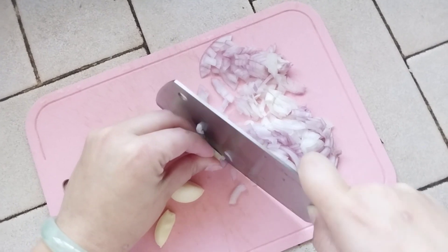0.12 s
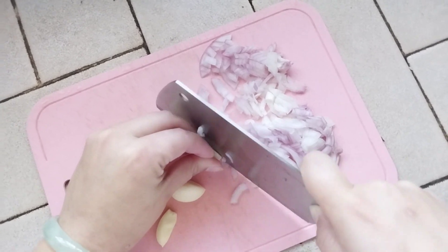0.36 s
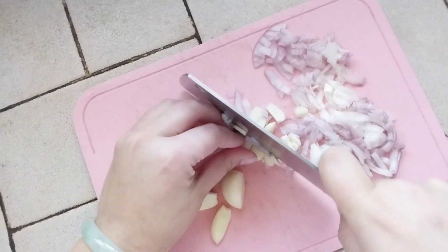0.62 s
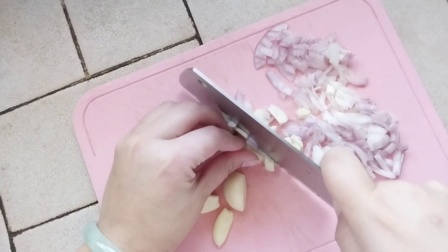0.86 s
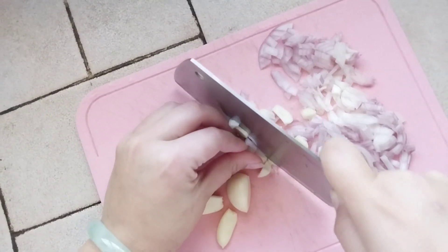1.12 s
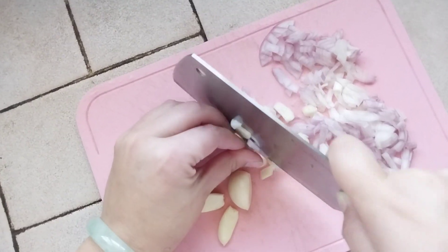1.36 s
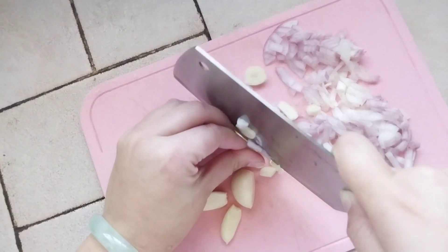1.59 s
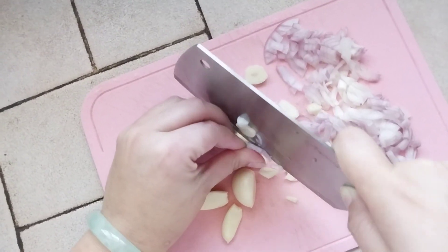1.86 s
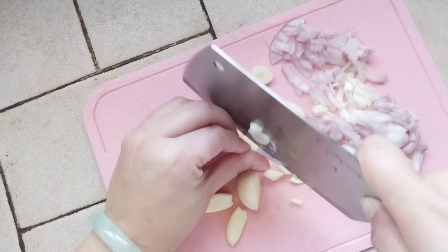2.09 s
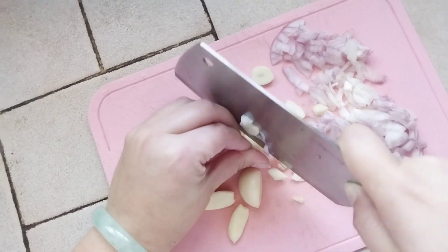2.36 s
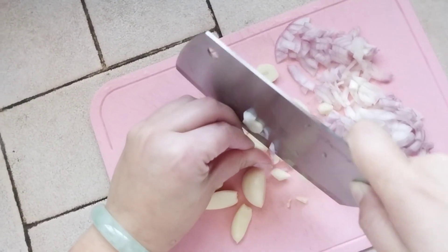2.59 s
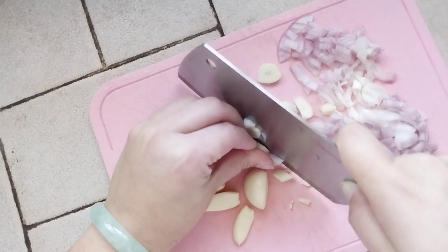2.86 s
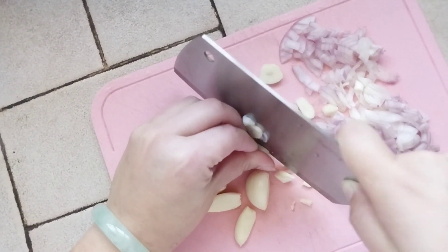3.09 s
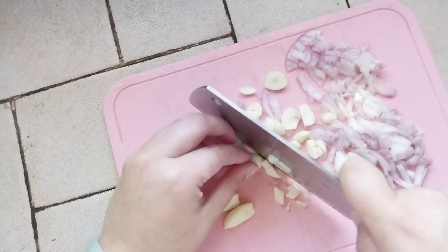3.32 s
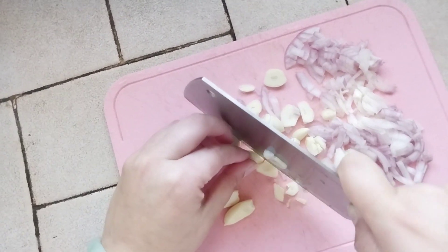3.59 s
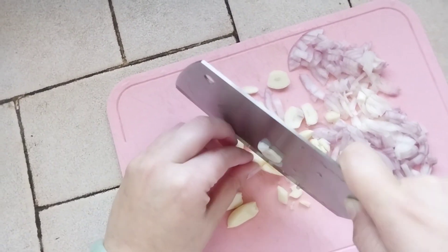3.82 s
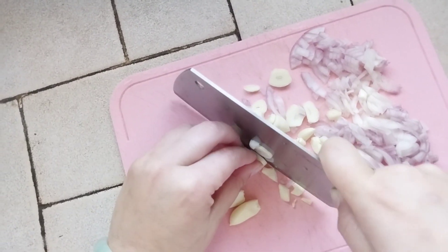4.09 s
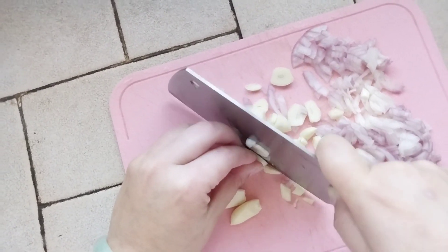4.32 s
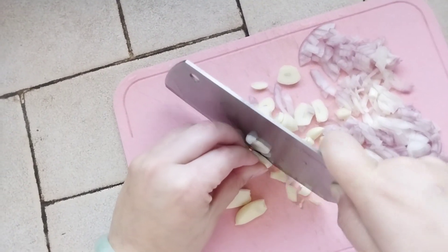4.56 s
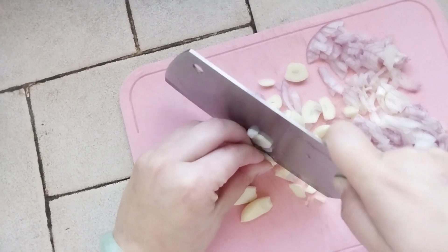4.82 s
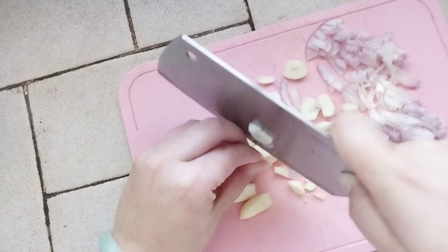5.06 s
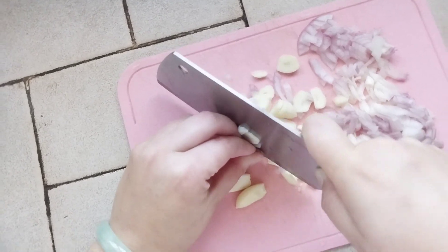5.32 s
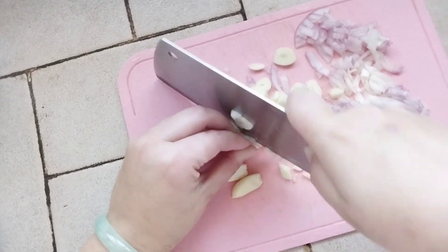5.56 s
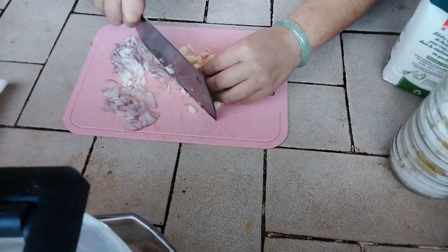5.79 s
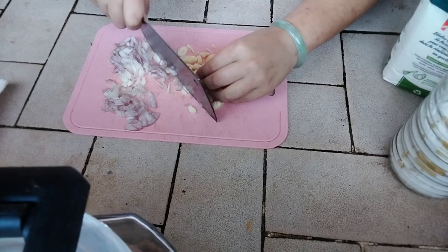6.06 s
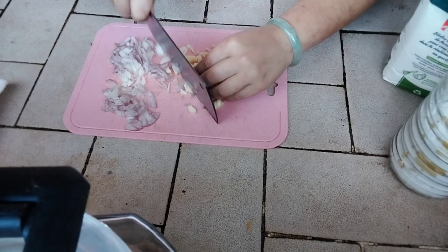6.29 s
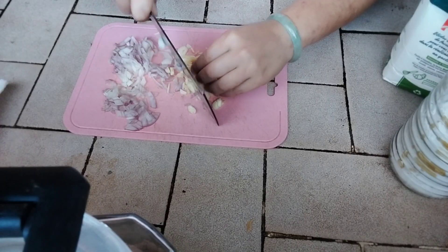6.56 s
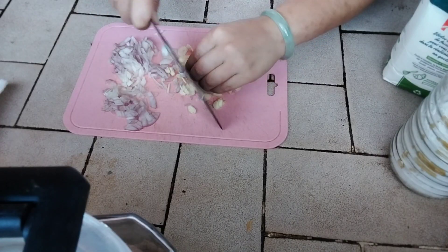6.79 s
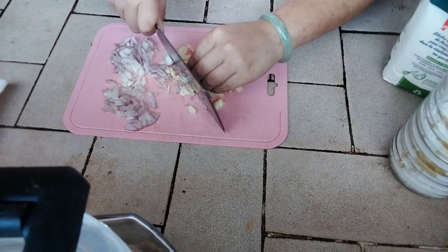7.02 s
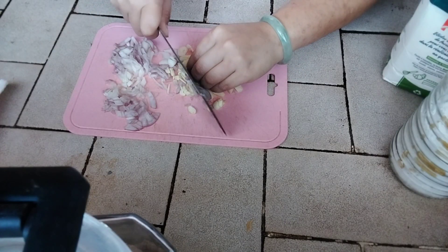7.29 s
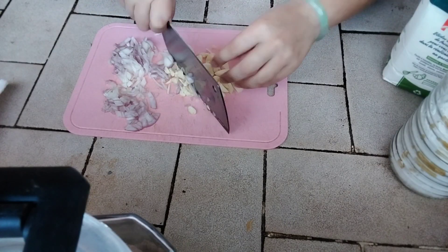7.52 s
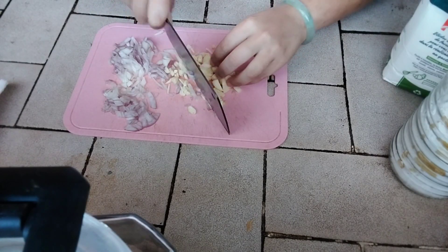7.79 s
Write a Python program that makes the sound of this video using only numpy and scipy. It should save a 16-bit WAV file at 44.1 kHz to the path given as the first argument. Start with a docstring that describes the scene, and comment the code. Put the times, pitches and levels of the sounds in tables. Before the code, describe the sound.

Outdoors on tiles near walls, a cleaver slices garlic on a thin plastic board, heard close in stereo. The fading tail of an earlier stroke opens the scene. From 0.1 s short crisp crackles end in hard, dry knocks, with an especially sharp one near 0.4 s. Strokes continue roughly four per second, uneven in force, with strong clacks around 1.5, 2.5, 2.9 and 3.2 s; some add dull thuds or a low boom, and brief diffuse echoes follow. A low breeze rumbles softly, dips about 3 s, then swells from 3.3 to 5 s, strongest near 4.7 s, while cutting goes on. A heavy crunchy double knock lands at 5.4 s. At about 5.7 s the sound abruptly becomes more distant and sheltered: wind nearly vanishes, and softer crunching strokes come about every third of a second until nearly 7.7 s, leaving faint outdoor hiss.

```python
"""Tiles near walls, in a breeze: a cleaver slices garlic on a thin plastic board beside a phone with two ports.
Each stroke crackles (dense random clicks, partly ringing the board) and ends in knocks (dying board modes).
Slower modes give thud and boom; noise tails are the walls' answer. Narrow noise bands make the breeze rumble.
From 5.72 s the breeze is all but gone, the crackle takes another colour and the strokes sound quieter."""
import sys
import numpy as np
from scipy import signal
from scipy.fft import rfft, irfft
from scipy.io import wavfile
from scipy.ndimage import uniform_filter1d

SR = 44100
rng = np.random.default_rng(int(sys.argv[2]) if len(sys.argv) > 2 else 0)


def ratio(d):
    """dB to gain"""
    e = np.asarray(d, float) / 20
    return 10 ** e


def int16_out(signal):
    """Quantize to a 16-bit WAV file."""
    q = np.round(np.clip(np.atleast_2d(signal).T, -1, 1) * 32767)
    wavfile.write(sys.argv[1], SR, q.astype(np.int16))


N = 348390
T = np.arange(N) / SR
HALF_S = T[:SR // 2]
SIDES = np.array([[1], [-1]])
CHANGE_S = 5.722  # from here the breeze drops and the crackle changes colour
PORT_LAG_SAMPLES = 5  # right port hears the board later
LOW_MODES = 3  # count of low board modes

# breeze level: time_s, level_db
WIND_LEVELS = [(0, -41.5), (0.56, -44.5), (0.95, -49), (1.5, -46.5), (2.8, -45.5), (3.05, -57), (3.32, -41),
               (3.34, -33.5), (3.8, -32), (4.1, -33.5), (4.65, -27), (4.95, -31.5), (5.22, -39),
               (5.6, -40.5), (5.71, -40), (5.73, -57), (6.6, -58.5), (7.9, -60.5)]
# breeze tone: freq_hz, gain_db
WIND_TONE = [(15, -48.5), (25, -9.5), (49, -27), (81, -5), (113, -8.5), (151, -3), (225, -8), (281, -13.5),
             (443, -38.5), (560, -35), (730, -67), (1230, -120)]
# outdoor hiss spectrum: freq_hz, density_rel_db
AIR_TONE = [(180, -39.5), (300, -3), (537, -5.5), (656, -2), (900, -11.5), (1430, -12.5), (1580, -17),
            (6200, -18), (9090, -21.5), (12500, -21), (16000, -38.5)]
# fading tail of an earlier stroke at the start, then faint scrapes and hums:
# peak_s, half_length_s (to 1/e), centre_hz, width_hz, level_db
FAINT_SOUNDS = [(0, 0.54, 1480, 2240, -52), (3.577, 0.069, 2850, 970, -54.5), (6.65, 0.016, 2800, 198, -76),
                (6.893, 0.083, 1420, 100, -69.5), (7.014, 0.018, 119, 80, -44),
                (7.669, 0.053, 205, 29.3, -49)]
# blade pushing through flesh: peak_s, crackle_db, rise_ms, fall_ms (both over 10 dB)
PUSHES = [(0.092, -45, 13, 46), (0.166, -30.5, 26, 16), (0.34, -43.5, 16, 29), (0.387, -29.5, 24, 6),
          (0.57, -38.5, 17, 5), (0.607, -29.5, 16, 4), (0.646, -31.5, 10.6, 7), (0.875, -39.5, 11, 9),
          (0.941, -46, 72, 19), (1.117, -42.5, 14.5, 56), (1.216, -35, 19.5, 14.5), (1.414, -45.5, 2.6, 56),
          (1.44, -49.5, 12, 60), (1.503, -30.5, 9.3, 29), (1.676, -47.5, 3, 64), (1.774, -36, 41.5, 21.5),
          (1.976, -31, 16.6, 17.5), (2.224, -45.5, 9.2, 75), (2.307, -37, 13.4, 19), (2.518, -29, 17.2, 24),
          (2.719, -28, 18, 32.5), (2.896, -38, 2.7, 31), (2.931, -32, 2.9, 17.5), (3.114, -50, 3.2, 11),
          (3.13, -52.5, 11, 26), (3.19, -48, 16, 19), (3.237, -39.5, 26.5, 12), (3.438, -31, 16.9, 17),
          (3.674, -53, 32, 28), (3.74, -43.5, 24, 18), (3.782, -33.5, 14.2, 11), (3.976, -39.5, 26, 59),
          (4.093, -27, 17.6, 10), (4.333, -42.5, 21, 15), (4.405, -29.5, 39, 9), (4.599, -43, 16, 59),
          (4.656, -43, 26, 30), (4.687, -31, 9.3, 10), (4.858, -32.5, 16.3, 28), (4.947, -38.5, 36, 19),
          (5.172, -34.5, 15.8, 21), (5.258, -41.5, 26, 22), (5.433, -24, 9.3, 40.5), (5.752, -33, 18, 9),
          (5.792, -33, 10.6, 28), (6.076, -51, 14, 36), (6.119, -34, 17.4, 35), (6.382, -47.5, 14, 30),
          (6.412, -36, 13.5, 28), (6.717, -46, 25, 41), (7.064, -36.5, 29.6, 25), (7.318, -40, 12.5, 45),
          (7.593, -33, 15, 18.5), (7.63, -47.5, 13, 57)]
# hand on the blade: time_s, board_over_crackle_db, low_over_high_modes_db
HAND_PRESSURE = [(0, 1, 0), (0.65, -1.5, 0.5), (0.88, 7, -5.5), (1.2, -1, 1), (1.7, 2.5, 0.5), (2, 7, -3),
                 (2.7, 5, -4), (3.4, 5.5, 3.5), (4, -1, -2), (4.9, -0.5, 0), (5.44, -2.5, -6),
                 (5.75, -6, -11), (6.12, 2.5, 5.5), (6.45, -2.5, 2), (7.06, -5.5, -2.5), (7.6, -4.5, -2.5)]
# crackle spectrum before 5.72 s: freq_hz, density_rel_db
FLESH_EARLY_TONE = [(710, -27), (1200, 6), (1470, -1.5), (1960, 0.5), (2280, -9), (3280, -4.5), (6650, -8),
                    (12000, -11.5), (15500, -40.5)]
# crackle spectrum from 5.72 s on: freq_hz, density_rel_db
FLESH_LATE_TONE = [(350, -41.5), (600, -18), (798, -21.5), (1450, -3.5), (1580, -5.5), (1780, -3.5),
                   (2680, -15), (3980, -9), (5820, -14.5), (15500, -20.5)]
# edge meets board or snaps a layer: time_s, blow_db, boom_rel_blow_db, thud_rel_blow_db
BLOWS = [(0.091, -8, -33, -14), (0.134, -6, -30, -15), (0.156, -8, -7, -2), (0.333, -30, -28, 2),
         (0.383, 9.5, -25, -11.5), (0.925, -13, -36, -10.5), (0.942, -8.5, -19, -11),
         (1.115, -5.5, -39, -19), (1.189, -17, -12, -12), (1.439, -10, -21, -13.5), (1.503, -16.5, -36, -5),
         (1.521, 2.5, -28, -16), (1.699, -16, -20, -12), (1.755, -30.5, -9, -12), (1.766, -14.5, -2, -3.5),
         (1.967, -4.5, -21.5, -42), (2.3, -6, -31, -15.5), (2.32, -1.5, -19.5, -21), (2.49, -31, -24, -27),
         (2.514, 2.5, -21.5, -34), (2.699, -6.5, -16, -35.5), (2.894, -22, -23, -15),
         (2.927, 8.5, -29, -22), (3.13, -17.5, -19, -14.5), (3.233, 4.5, -31.5, -20),
         (3.428, -11, -12, -4.5), (3.777, 0.5, -15, -6), (3.958, -15.5, 0, -9), (4.088, 4.5, -16.5, -16),
         (4.348, -8, -9, -14), (4.378, -13, -7, -21), (4.401, -1.5, -15.5, -2), (4.685, -7.5, -24, 2),
         (4.857, -24, -14.5, -5), (4.876, -19, -14, -13), (4.913, -17, -12, -34), (5.167, -2, -34, -20.5),
         (5.429, -2, -11.5, -9.5), (5.443, 1, -17, -11.5), (5.752, -11.5, -32, -34), (5.794, -31, -30, -15),
         (6.114, -24, -31, -40), (6.412, -12.5, -31, -34.5)]
# board flexing: freq_hz, level_rel_db, t60_s
BOARD_MODES = [(1145, -22.5, 0.036), (1295, -5, 0.02), (1449, 8, 0.012), (1766, 12.5, 0.0077),
               (1994, -2, 0.015), (2683, 11.5, 0.0036), (3207, -0.5, 0.012), (3840, 5.5, 0.0041)]
# board slapping flat, a thud: freq_hz, level_rel_db, t60_s
SLAP_MODES = [(290, 0, 0.03), (367.2, -1.5, 0.048), (473, 1, 0.024), (560, -7, 0.042)]
# board on its tiles, a boom: freq_hz, level_rel_db, t60_s
BED_MODES = [(91.9, -18, 0.49), (117.1, 0, 0.19), (144, -5.5, 0.23), (205, -5.5, 0.11)]
# echo bands: freq_hz, density_db, t60_s
WALL_BANDS = [(253, -5, 0.37), (620, -8, 0.47), (1360, -15, 0.52), (2800, -8.5, 0.45), (5600, -9.5, 0.45),
              (11900, -12, 0.32)]
# brief drops of level: centre_s, half_length_ms (to 1/e of depth), depth_db
LEVEL_DIPS = [(.577, 2.36, -30), (0.622, 5.1, -49), (3.327, 3.8, -43), (3.372, 4.9, -32), (5.768, 6.6, -49)]
# port response: freq_hz, gain_db
PORT_TONE = [(6000, -1), (8500, -5), (12000, 2), (15000, 5)]


def unit(x):
    """Scale to rms 1."""
    return x / np.sqrt(np.mean(x ** 2))


def bandpass(x, low_hz, high_hz):
    """Second-order resonant band between two edges."""
    return signal.sosfilt(signal.butter(2, [low_hz, high_hz], "bandpass", fs=SR, output="sos"), x)


def colour(x, points):
    """Minimum-phase filter through (freq_hz, gain_db) points, by folding the cepstrum."""
    hz, db = np.transpose(points)
    size = 4096
    grid_hz = np.maximum(np.fft.rfftfreq(size, 1 / SR), 1)
    gain = ratio(np.interp(np.log(grid_hz), np.log(hz), db))
    cepstrum = irfft(np.log(gain))
    cepstrum[1:size // 2] *= 2
    cepstrum[size // 2 + 1:] = 0
    response = irfft(np.exp(rfft(cepstrum)))
    return signal.fftconvolve(x, response)[:len(x)]


def walk(rate_hz):
    """Random levels held for one period, smoothed twice, rms 1."""
    hold = int(SR / rate_hz)
    steps = np.repeat(rng.standard_normal(N // hold + 1), hold)
    smooth = uniform_filter1d(uniform_filter1d(steps, hold), hold)
    return unit(smooth[:N])


def ring(modes, chance, scatter_db, scatter_share):
    """Half a second of dying sines, peak 1; chance detunes and reweights the modes."""
    out = 0
    for (hz, db, t60_s), louder, sharper in zip(modes, chance, chance[::-1]):
        tone = np.sin(2 * np.pi * hz * (1 + scatter_share * sharper) * HALF_S)
        out = out + ratio(db + scatter_db * louder) * tone * 1000 ** (-HALF_S / t60_s)
    return out / np.abs(out).max()


def steady_ring(x, modes):
    """Drive unscattered modes with a signal."""
    return signal.fftconvolve(x, ring(modes, np.zeros(len(modes)), 0, 0))[:N]


def onset(build_s):
    """Exponential build-up of a ring."""
    return 1 - np.exp(-HALF_S / build_s)


def wind():
    """Eddies rumble on the ports: narrow bands puff up independently, partly shared."""
    out = 0
    for hz in 25 * 2 ** np.arange(0, 4.6, .25):
        mid, side = bandpass(rng.standard_normal((2, N)), hz / 1.06, hz * 1.06)
        puff = ratio(6 * walk(6))
        side_db = np.interp(hz, [40, 120], [0.1, -5]) + 1.2 * walk(4.4)
        out = out + puff * mid + ratio(side_db) * side * SIDES
    rumble = unit(np.array([colour(port, WIND_TONE) for port in out]))
    return ratio(np.interp(T, *np.transpose(WIND_LEVELS))) * rumble


def air():
    """Far outdoor hiss: coloured noise, independent per port, wavering slightly."""
    ports = []
    for _ in range(2):
        hiss = unit(colour(rng.standard_normal(N), AIR_TONE))
        ports.append(ratio(-65.5 + 0.28 * walk(4)) * hiss)
    return np.array(ports)


def faint_sounds():
    """An earlier stroke's fading tail, then scrapes and hums: band-passed noise under Gaussian envelopes."""
    out = np.zeros((2, N))
    for s, half_length_s, hz, width_hz, db in FAINT_SOUNDS:
        noise = bandpass(rng.standard_normal((2, N)), hz - width_hz / 2, hz + width_hz / 2)
        out += ratio(db) * unit(noise) * np.exp(-((T - s) / half_length_s) ** 2)
    return out


def push_gain():
    """Each push through the flesh swells and fades at its own pace."""
    gain = np.zeros(N)
    for s, db, rise_ms, fall_ms in PUSHES:
        near = slice(max(int((s - .25) * SR), 0), int((s + .25) * SR))
        ms = 1000 * (T[near] - s)
        span_ms, power = np.where(ms < 0, rise_ms, fall_ms), np.where(ms < 0, 1.8, 1.4)
        gain[near] += ratio(db - 10 * np.abs(ms / span_ms) ** power)
    return gain


def crackle():
    """Cells burst as dense clicks of uneven size; some of the push rings the board and its bed."""
    air_gain = push_gain()
    time_s, press_db, low_db = np.transpose(HAND_PRESSURE)
    board_gain = air_gain * ratio(np.interp(T, time_s, press_db))
    lean = ratio(np.interp(T, time_s, low_db) / 2)
    # most cells are small, a few snap louder
    size = ratio(2.2 * np.minimum(rng.exponential(size=N), 5) + 1.3 * walk(150))
    shared, left, right = rng.standard_normal((3, N)) * (rng.random(N) < .4) * size
    ports = []
    for bursts in (left + 0.27 * shared, right + 0.13 * np.roll(shared, PORT_LAG_SAMPLES)):
        low = unit(steady_ring(bursts, BOARD_MODES[:LOW_MODES]))
        high = unit(steady_ring(bursts, BOARD_MODES[LOW_MODES:]))
        push = (lean * low + high / lean) / np.hypot(lean, 1 / lean)
        near, late = unit(colour(bursts, FLESH_EARLY_TONE)), unit(colour(bursts, FLESH_LATE_TONE))
        ports.append(air_gain * np.where(T < CHANGE_S, near, late) + board_gain * push)
    boom = steady_ring(board_gain * unit(shared), BED_MODES)
    return np.array(ports) + ratio(-48.5) * boom


def knocks():
    """Blows ring board, slap and bed modes, scattered anew; the edge clicks as it shears the last fibres."""
    out = np.zeros((2, N + SR))
    click_lead_s, click_spread_s = .0005, .0015
    click_peak_s = 4 * click_spread_s
    click_shape = np.exp(-np.abs(HALF_S - click_peak_s) / click_spread_s)
    for s, db, boom_db, thud_db in BLOWS:
        click_db = -22 + 0.45 * db  # clicks vary less than blows
        place = rng.standard_normal(len(BOARD_MODES))
        # the board flexes down for some milliseconds before it booms fully
        boom = ring(BED_MODES, rng.standard_normal(len(BED_MODES)), 5.9, 0.026) * onset(.0038)
        thud = ring(SLAP_MODES, rng.standard_normal(len(SLAP_MODES)), 2.2, .03) * onset(.0015)
        for port in range(2):
            click = uniform_filter1d(rng.standard_normal(len(HALF_S)), size=2) * click_shape
            seen = place + .4 * rng.standard_normal(len(BOARD_MODES))  # each port's mix of modes
            # the top face first moves away; contact builds over a fraction of a millisecond
            rap = -ring(BOARD_MODES, seen, 2.6, .035) * onset(.0005)
            blow = rap + ratio(boom_db) * boom + ratio(thud_db) * thud
            at = int((s + .0006) * SR) + port * PORT_LAG_SAMPLES
            out[port, at:at + len(blow)] += ratio(db) * blow
            at -= int((click_peak_s + click_lead_s) * SR)
            out[port, at:at + len(click)] += ratio(click_db) * click
    return out[:, :N]


def echoes():
    """Diffuse noise tail, each band with its own decay; ports more alike in the bass."""
    tail = 0
    for hz, db, t60_s in WALL_BANDS:
        mid, side = bandpass(rng.standard_normal((2, len(HALF_S))), hz / 1.5, hz * 1.5)
        fade = 1000 ** (-HALF_S / t60_s) * (HALF_S > .004)  # first 4 ms silent
        band = fade * (mid + min(hz / 1100, 1) * side * SIDES) / mid.std()
        tail = tail + ratio(db) * band / np.sqrt(np.sum(fade ** 2)) * np.sqrt(hz / SR)
    return tail


def walls(x):
    """Overlapping windows, one every 93 ms, each get a freshly drawn noise tail: no fixed pattern repeats."""
    hop = 4096
    out = np.zeros((2, N + SR))
    for at in range(0, N, hop):
        part = x[at:at + 2 * hop]
        faded = part * np.hanning(2 * hop)[:len(part)]
        wet = signal.fftconvolve(faded[None], echoes(), axes=1)
        out[:, at:at + wet.shape[1]] += wet
    return out[:, :N]


def dips():
    """Gain that drops for a few milliseconds at a time."""
    return ratio(sum(db * np.exp(-(1000 * (T - s) / ms) ** 4) for s, ms, db in LEVEL_DIPS))


def scene():
    """Board sounds, their echoes, breeze and hiss, all under the level dips."""
    # a small board radiates little deep bass
    thin = signal.butter(2, 75, "highpass", fs=SR, output="sos")
    work = signal.sosfilt(thin, knocks() + crackle() + faint_sounds())
    return dips() * (work + walls(work.mean(axis=0)) + wind() + air())


def roll_off(x):
    """The treble ends steeply here."""
    return signal.sosfilt(signal.butter(12, 16990, fs=SR, output="sos"), x)


def record(dry):
    """The phone's port resonance shapes the treble; filters cut the deepest bass and the top."""
    ports = [colour(port, PORT_TONE) for port in dry]
    bass_cut = signal.butter(2, 25, "highpass", fs=SR, output="sos")
    top_cut = signal.ellip(8, .2, 40, 15800, fs=SR, output="sos")
    mix = signal.sosfilt(np.vstack([bass_cut, top_cut]), ports)
    return roll_off(mix)


dry = scene()
out = record(dry)
int16_out(out)
```